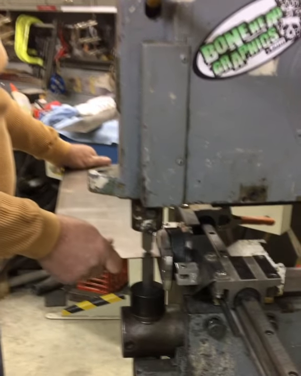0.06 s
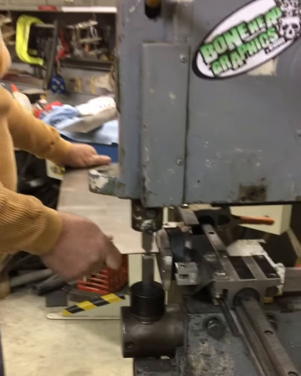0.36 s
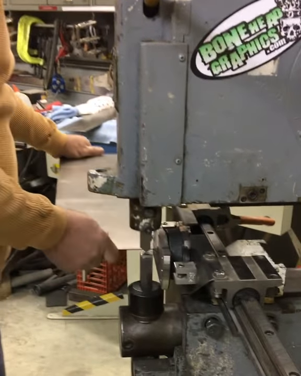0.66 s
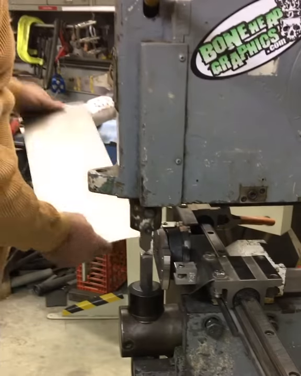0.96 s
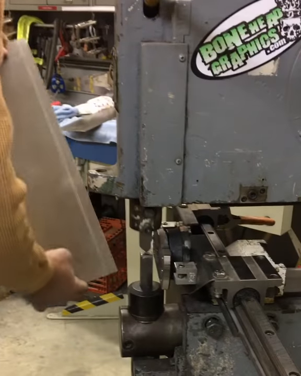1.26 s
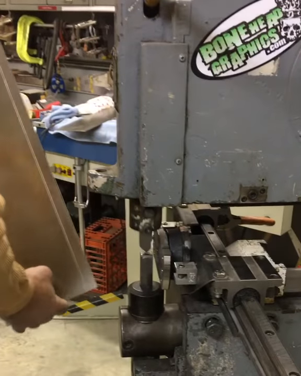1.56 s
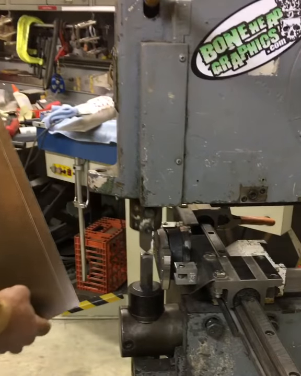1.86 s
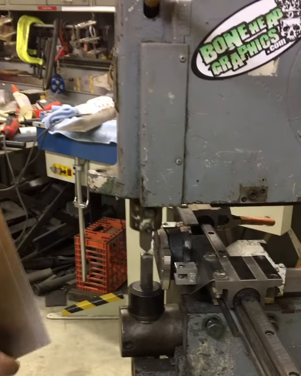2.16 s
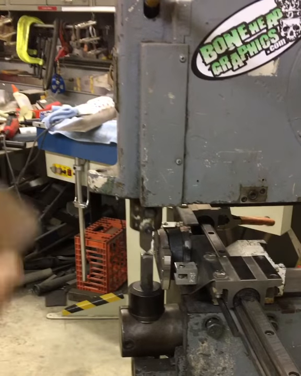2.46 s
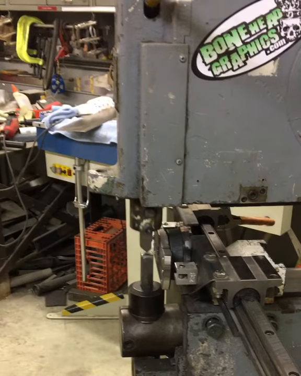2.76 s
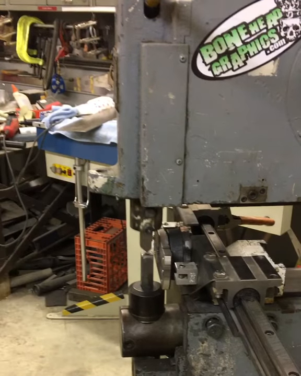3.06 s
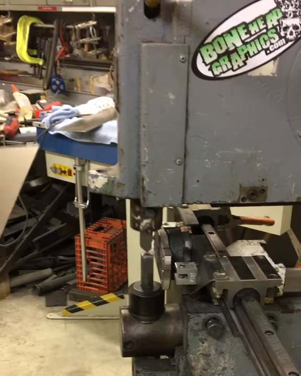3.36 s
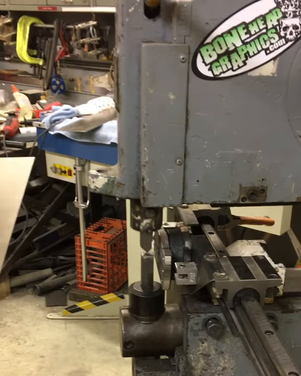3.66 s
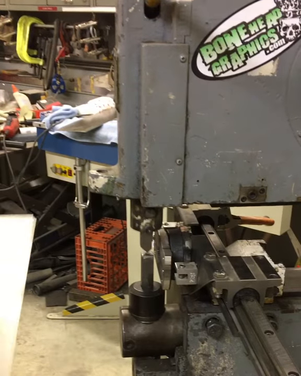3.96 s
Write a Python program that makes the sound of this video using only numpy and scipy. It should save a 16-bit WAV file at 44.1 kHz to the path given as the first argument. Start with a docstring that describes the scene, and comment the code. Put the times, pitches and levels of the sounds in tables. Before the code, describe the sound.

In a workshop, a power hammer pounds sheet metal so fast that the blows blur together. They stop almost at once, the sheet slaps and rings, and a low motor hum continues with a light, quick clatter.

```python
"""A power hammer beats a metal sheet in a workshop, its periodic impacts, thirty strokes a second,
fusing into a harmonic series. After half a second the sheet is drawn from between the dies, slaps them
and booms briefly in free vibration. The machine idles on: the motor hums, the linkage knocks on every
turn. An automatic gain control, held down by the din, then recovers."""
import sys
import numpy as np
from scipy import signal
from scipy.fft import rfft, irfft
from scipy.io import wavfile
from scipy.ndimage import uniform_filter1d, minimum_filter1d

SR = 44100
rng = np.random.default_rng(int(sys.argv[2]) if len(sys.argv) > 2 else 0)


def pcm_store(signal):
    """Save signal as 16-bit PCM."""
    levels = np.round(np.clip(np.atleast_2d(signal), -1, 1) * 32767)
    wavfile.write(sys.argv[1], SR, levels.astype(np.int16).T)


N = 176400

# Levels are relative; a spectrum gives only the shape of a noise's spectral density.
# noise of motor, belt and air [f/Hz, level/dB]
AIR_SPECTRUM = [(25, -8), (60, 10), (130, 1.5), (300, 2), (520, -6.5), (800, 0), (1050, 0.5), (1300, -3.5),
                (1900, -4.5), (2700, -11.5), (4000, -12), (5000, -14.5), (6500, -11.5), (8200, -14.5),
                (9500, -14), (10400, -17.5), (11200, -15.5), (12500, -16), (13300, -14), (15000, -18.5)]
# resonances of loose panels [f/Hz, bandwidth/Hz, level/dB]
PANEL_MODES = [(89.4, 6, -50), (147, 2.4, -52), (207, 19, -50.5), (359.7, 18, -45)]
# knocks of the linkage, which set the phases of the idling harmonics [phase/turn, f/Hz, bandwidth/Hz,
# level/dB]
LINKAGE_KNOCKS = [(.974, 910, 35, -8), (.51, 876, 45, -11), (.102, 493, 56, -13), (.739, 508, 123, -7),
                  (.344, 791, 52, -14), (.832, 633, 179, -4), (.048, 229, 90, -6), (.182, 1495, 100, -4)]
# harmonics of the crank rate from the first upward, idling and hammering [level/dB]
IDLE_HARMONICS = [-36, 0, -15, -25, -15, -26, -13.5, -18, -22, -21, -31, -26, -22, -13.5, -32, -17, -33,
                  -27, -18, -25, -33, -15.5, -33, -16, -15, -26, -22, -24, -23, -35, -23.5, -16.5, -13.5,
                  -10, -19, -9.5, -26, -21, -34, -30, -32, -24, -34, -27, -35, -26, -30, -21.5, -35, -30,
                  -32, -33, -33, -41, -38, -27.5, -25, -32, -30, -26, -39, -38, -30, -27.5]
WORK_HARMONICS = [-51, -7, -14, -9, -12, -14, -15, -10, -23, -20, -11, -6.5, -17, -12, -11, -13, -16, 1,
                  -17, -22, -20, -20, -19, -14, -16, -20, -32, -24, -28, -22, -24, -21, -19, -14, -22, -18,
                  -23, -24, -26, -28, -24, -20, -22, -23, -22, -25, -29, -21.5, -21.5, -22.5]
# spectral envelopes of the harmonics above those [f/Hz, level/dB]
IDLE_TREBLE = [(1950, -33.5), (2100, -37), (2500, -42), (3600, -60)]
WORK_TREBLE = [(1530, -33), (1800, -26), (2000, -31), (2130, -31), (2300, -37), (2600, -38), (3600, -33.5)]
# boundaries between the hum, body, whirr and rattle bands [f/Hz]
CROSSOVERS_HZ = [190, 800, 1150]
# the motor hum is weak as the hammering ends, then swells to a steady level [t/s, level/dB]
HUM_GAIN = [(.6, -7.5), (1, -2), (1.4, 1), (4, 0)]
# slow rise and fall of the idling body, whirr and rattle [t/s, level/dB]
BODY_GAIN = [(.8, -0.5), (1.4, -3), (2, 0.5), (2.5, 0.7), (2.85, .5), (4, 1.7)]
WHIRR_GAIN = [(.7, -3), (1.2, 1.5), (1.7, 0.7), (2.15, -1), (2.68, -.5), (2.87, -0.5), (3.15, -0.5),
              (3.45, -1.7), (4, -6)]
RATTLE_GAIN = [(.7, 4), (.88, 6), (1.13, 6.5), (1.5, 4.5), (1.8, 6), (2.15, 4.5), (2.33, -1.5), (2.6, -2),
               (2.9, -.5), (4, -2)]
# tones of the sheet flexing in the hands [peak t/s, f/Hz, level/dB, rise/s, T60/s]
FLEX_TONES = [(0.6983, 153, -30.5, 0.26, 6.7), (1.1039, 149, -38.5, .15, 2.4),
              (1.969, 361.5, -35.5, 0.064, .6)]
# friction of the sheet on a sleeve and on the die [f/Hz, level/dB]
SLEEVE_SPECTRUM = [(1000, -27), (3000, -6), (8000, -6), (14000, -5)]
SCRAPE_SPECTRUM = [(1000, -25), (1500, -6), (1800, 7), (2200, -9), (3000, -14), (9000, -24), (15000, -35)]
# slaps of the loose sheet on the dies [t/s, level/dB]
SHEET_SLAPS = [(.472, -30), (.507, -24), (.55, -18), (.584, -20), (.648, -25)]
# crack of a slap [f/Hz, level/dB]
CRACK_SPECTRUM = [(200, 3), (1200, 4), (2400, -11), (4000, -16), (12000, -32)]
# modes of the free sheet [f/Hz, level/dB, T60/s]
FREE_SHEET_MODES = [(122.5, -13, 0.72), (148, -10, 0.31), (176.3, -5, 0.73), (207.8, -7, 0.53),
                    (351.7, -1.5, 0.29), (408, -5.5, 0.19), (452, -6.5, 0.69), (535.5, -5.5, 0.59)]
# modes of the steel ram [f/Hz, level/dB, T60/s]
STEEL_MODES = [(5240, -11, 0.0073), (6480, -5.5, 0.018), (7170, -5, 0.01), (7750, -10, 0.0064),
               (9050, -6, .005)]
# strength of the ram's ticks [t/s, level/dB]
TICK_STRENGTH = [(0, -19), (.5, -13.5), (.65, -38), (1.4, -32.5), (2.2, -39.5), (4, -46)]
# sharp nicks of the die on the sheet [t/s, level/dB]
DIE_NICKS = [(0.15, -9), (.183, -8), (.217, -7.5)]
# sizzle of the sheet under the dies [f/Hz, level/dB]
SIZZLE_SPECTRUM = [(60, -7), (200, -3.5), (500, 6.5), (800, 0.5), (1400, 0), (2000, -1.5), (3000, -8.5),
                   (4500, -6.5), (5700, -9), (6700, -8), (9000, -11), (10500, -16), (13000, -15.5),
                   (15000, -22)]
# contacts of die and sheet in one turn [phase/turn, f/Hz, bandwidth/Hz, level/dB]
DIE_BLOWS = [(.03, 452, 116, -1), (.367, 573, 160, 1), (.703, 520, 83, -2), (.755, 144, 25, -6),
             (.263, 229, 40, -1), (.833, 1121, 115, -11)]
# force of the dies on the sheet [t/s, level/dB]
DIE_FORCE = [(0, 0), (.36, 0), (.49, -2), (.53, -5.5), (.58, -10), (.605, -14.5), (.66, -40), (.8, -90)]

CRANK_HZ = 29.905
SLIP_S, LOOSE_S = 0.36, 0.47   # the sheet starts to slip, then lies loose between the dies
TIME = np.arange(N) / SR


def from_db(db):
    """Amplitude ratio of a level."""
    return 10 ** (np.asarray(db) / 20)


def in_time(rows):
    """Linear interpolation over time."""
    return np.interp(TIME, *np.transpose(rows))


def at_hz(points, hz):
    """Interpolation over logarithmic frequency."""
    freqs, levels = np.transpose(points)
    return np.interp(np.log(hz), np.log(freqs), levels)


def drift(corner_hz):
    """Low-pass filtered noise: a slow random fluctuation of unit rms."""
    step = 100   # samples between computed points
    pole = np.exp(-2 * np.pi * corner_hz * step / SR)
    white = rng.standard_normal(N // step + 1002)
    slow = signal.lfilter([1], [1, -2 * pole, pole * pole], white)[1000:]
    return np.interp(np.arange(N) / step, np.arange(len(slow)), rms_one(slow))


def rms_one(x):
    """Normalisation to unit rms."""
    return x / np.sqrt(np.mean(x ** 2) + 1e-20)


def noise(spectrum):
    """Spectral shaping of white noise, at unit rms."""
    hz = np.arange(N // 2 + 1) * SR / N + 1e-3
    return rms_one(irfft(rfft(rng.standard_normal(N)) * from_db(at_hz(spectrum, hz)), N))


def resonator(force, hz, width_hz):
    """Damped oscillator: a unit impulse excites a decaying sine of unit amplitude."""
    r, w = np.exp(-np.pi * width_hz / SR), 2 * np.pi * hz / SR
    return signal.lfilter([0, np.sin(w)], [1, -2 * r * np.cos(w), r * r], force + 1e-18)


def bandwidth(t60):
    """Half-power bandwidth in Hz, inversely proportional to decay time."""
    return np.log(1000) / np.pi / t60


def once_a_turn(turn, phase):
    """Impulse train locked to a crank phase, and a Gaussian number held for each turn."""
    whole = np.floor(turn - phase).astype(int)
    return np.diff(whole, prepend=whole[0]), rng.standard_normal(130)[whole % 130]


def crank(drag_hz=0.035, wander_turns=0.00061):
    """Crank angle in turns: the load slows the rotation slightly."""
    lag = drag_hz * np.cumsum(from_db(in_time(DIE_FORCE))) / SR
    return CRANK_HZ * TIME - lag + lag[-1] / 2 + wander_turns * drift(1.5)


def harmonic_bands(turn, knocks, low_db, treble, lift_db, waver_db, count=115):
    """Fourier series of periodic knocks, in four bands; the knocks' resonances set the phases."""
    orders = np.arange(1, count + 1)
    hz = orders * CRANK_HZ
    treble_db = at_hz(treble, hz) + 1.5 * rng.standard_normal(count)
    gains = from_db(np.concatenate([low_db, treble_db[len(low_db):]]))
    gains /= np.sqrt(np.sum(gains ** 2) / 2)
    response = sum(from_db(db) * np.exp(-2j * np.pi * orders * phase) / (width / 2 + 1j * (hz - centre))
                   for phase, centre, width, db in knocks)
    # reflections smear the timing of the treble
    angles = np.where(hz < 1250, np.angle(response), 2 * np.pi * rng.random(count))
    bands = np.zeros((4, N))
    for order, gain, angle, band in zip(orders, gains, angles, np.searchsorted(CROSSOVERS_HZ, hz)):
        depth = (from_db(waver_db) - 1) * (.3 if order == 2 else 1)   # the motor hum is steadier
        amplitude = gain * from_db(lift_db(order * CRANK_HZ)) * (1 + depth * drift(4.4))
        bands[band] += amplitude * np.cos(2 * np.pi * order * turn + angle)
    return bands


def air(turn, level_db=-34, pulse_db=0.86):
    """Broadband noise of motor, belt and air, amplitude-modulated at the crank rate."""
    return from_db(level_db + pulse_db * np.cos(2 * np.pi * (turn - 0.58))) * noise(AIR_SPECTRUM)


def panels():
    """Resonance under random excitation: loose panels drone in narrow bands."""
    return sum(from_db(db) * rms_one(resonator(rng.standard_normal(N), hz, width))
               for hz, width, db in PANEL_MODES)


def reflection_db(hz, crest_hz=780, spacing_hz=278, depth_db=5.5):
    """Interference: the sheet's reflection ripples the middle harmonics until it is carried off."""
    nearness = in_time([(1, 1), (2, 0)])
    offset = (hz - crest_hz) / spacing_hz
    return nearness * depth_db * np.cos(2 * np.pi * offset) * (-1 < offset < .25)


def motor_and_linkage(turn):
    """Periodic excitation: the motor hums and the linkage knocks, its whirr throbbing once a turn."""
    bands = harmonic_bands(turn, LINKAGE_KNOCKS, IDLE_HARMONICS, IDLE_TREBLE, reflection_db, waver_db=.9)
    hum, body, whirr, rattle = from_db(-25) * bands
    throb_db = 3.2 * np.cos(2 * np.pi * (turn - 0.83))
    return (hum * from_db(in_time(HUM_GAIN))
            + body * from_db(in_time(BODY_GAIN))
            + whirr * from_db(in_time(WHIRR_GAIN) + throb_db)
            + rattle * from_db(in_time(RATTLE_GAIN)))


def rub(spectrum, peak_s, half_width_s, db):
    """Sliding friction of the sheet: noise under a Gaussian envelope."""
    return from_db(db) * np.exp(-((TIME - peak_s) / half_width_s) ** 2) * noise(spectrum)


def sheet_flexing():
    """Bending vibration of the carried sheet: each tone swells, then decays exponentially."""
    tones = np.zeros(N)
    for peak_s, hz, db, rise, t60 in FLEX_TONES:
        age = TIME - peak_s
        envelope = np.exp(-(np.minimum(age, 0) / rise) ** 2 - np.log(1000) * np.maximum(age, 0) / t60)
        tones += from_db(db) * envelope * np.sin(2 * np.pi * hz * age)
    return tones


def sheet_slaps(crack_t60=0.024):
    """Impulse response: the loose sheet strikes the dies with a crack, and its modes ring on."""
    impulses, crack_envelope = np.zeros(N), np.zeros(N)
    for start, db in SHEET_SLAPS:
        impulses[int(start * SR)] += from_db(db)
        crack_envelope += from_db(db - 60 * np.maximum(TIME - start, 0) / crack_t60) * (TIME >= start)
    modes = sum(from_db(db) * resonator(impulses, hz, bandwidth(t60)) for hz, db, t60 in FREE_SHEET_MODES)
    return modes + crack_envelope * noise(CRACK_SPECTRUM)


def ram(turn, spread_db=1.5, contact_s=0.00023):
    """Impact excitation of the ram's high modes: a tick on every stroke and a few harder nicks."""
    impulses, chance = once_a_turn(turn, phase=.47)
    impulses = impulses * from_db(in_time(TICK_STRENGTH) + spread_db * chance)
    for start, db in DIE_NICKS:
        impulses[int(start * SR)] += from_db(db)
    decay = np.exp(-np.arange(SR // 50) / (contact_s * SR))
    contact = signal.fftconvolve(impulses, decay / np.linalg.norm(decay))[:N] * rng.standard_normal(N)
    return sum((-1) ** i * from_db(db) * resonator(contact, hz, bandwidth(t60))
               for i, (hz, db, t60) in enumerate(STEEL_MODES))


def boom_db(hz, held_hz=182, loose_hz=150, width_hz=17):
    """A low resonance of the sheet lifts the nearest harmonic; its pitch sinks as the dies let go."""
    if hz > 2 * held_hz:
        return 0
    centre_hz = in_time([(SLIP_S, held_hz), (LOOSE_S, loose_hz)])
    peak_db = in_time([(SLIP_S, 13), (LOOSE_S, 11)])
    return peak_db * np.exp(-((hz - centre_hz) / width_hz) ** 2)


def uneven_blows(turn):
    """Aperiodic part of the blows: impulses of random strength excite each contact's resonance."""
    ringing = np.zeros(N)
    for phase, hz, width, db in DIE_BLOWS:
        impulses, chance = once_a_turn(turn, phase)
        ringing += from_db(db) * resonator(impulses * chance, hz, width)
    return rms_one(ringing)


def hammering(turn):
    """Forced vibration: the dies beat the sheet, which sizzles and rattles more as it comes loose."""
    bands = harmonic_bands(turn, DIE_BLOWS, WORK_HARMONICS, WORK_TREBLE, boom_db, waver_db=.8)
    blows = from_db(-9.5) * bands.sum(axis=0)
    rattle = from_db(in_time([(SLIP_S, -32), (LOOSE_S, -16)])) * uneven_blows(turn)
    bounces = np.cos(6 * np.pi * (turn - 0.17))   # the sheet bounces three times a stroke
    sizzle = from_db(-18 + 0.2 * (bounces + drift(81))) * noise(SIZZLE_SPECTRUM)
    return from_db(in_time(DIE_FORCE)) * (blows + rattle + sizzle)


def scene():
    """Superposition of all sources, alike in both channels; one crank times the machine."""
    turn = crank()
    mono = motor_and_linkage(turn) + panels() + air(turn)
    mono += hammering(turn) + sheet_slaps() + ram(turn) + sheet_flexing()
    mono += rub(SCRAPE_SPECTRUM, peak_s=0.32, half_width_s=0.029, db=-27)
    mono += rub(SLEEVE_SPECTRUM, peak_s=3.79, half_width_s=0.12, db=-41)
    return np.array([mono, mono])


def record(dry):
    """Automatic gain control with hold and steady recovery, followed by a steep low-pass filter."""
    limit_db, hold_s, recovery_db_per_s, cutoff_hz = -17, 0.3, 19, 15250
    power = uniform_filter1d(dry[0] ** 2, size=2950)
    level_db = 10 * np.log10(np.maximum(power, 1e-12))
    needed_db = np.minimum(limit_db - level_db, 0)
    half_hold = int(hold_s * SR) // 2
    held_db = minimum_filter1d(needed_db, 2 * half_hold + 1, origin=half_hold, mode="nearest")
    ramp_db = recovery_db_per_s * TIME
    gain_db = np.minimum.accumulate(held_db - ramp_db) + ramp_db   # rises no faster than the ramp
    lowpass = signal.ellip(12, .1, 90, cutoff_hz, fs=SR, output="sos")
    return signal.sosfilt(lowpass, dry * from_db(gain_db))


dry = scene()
out = record(dry)
pcm_store(out)
```